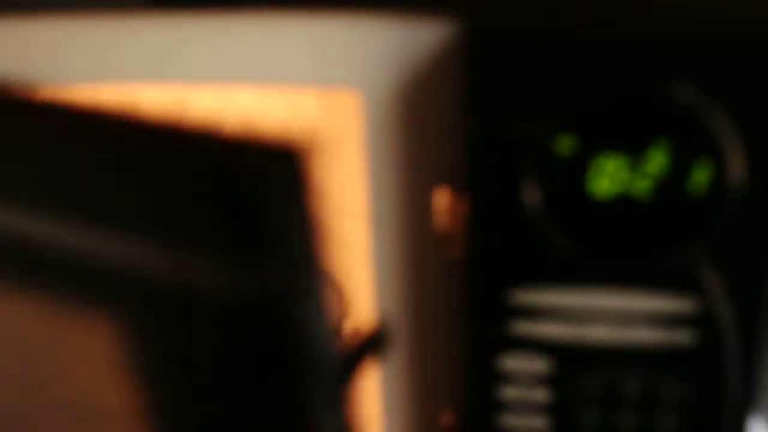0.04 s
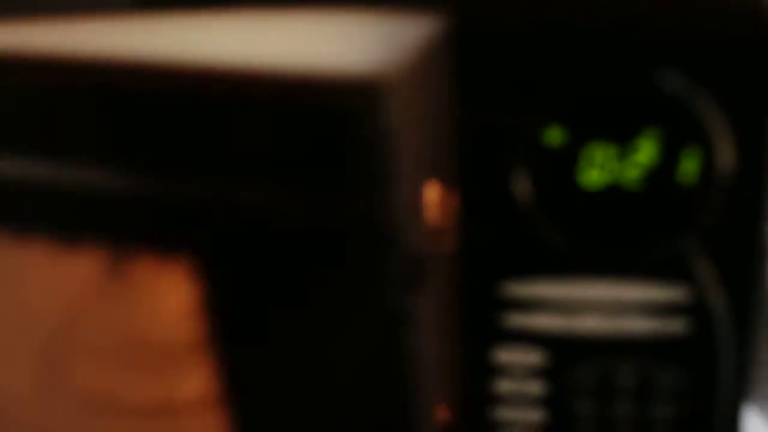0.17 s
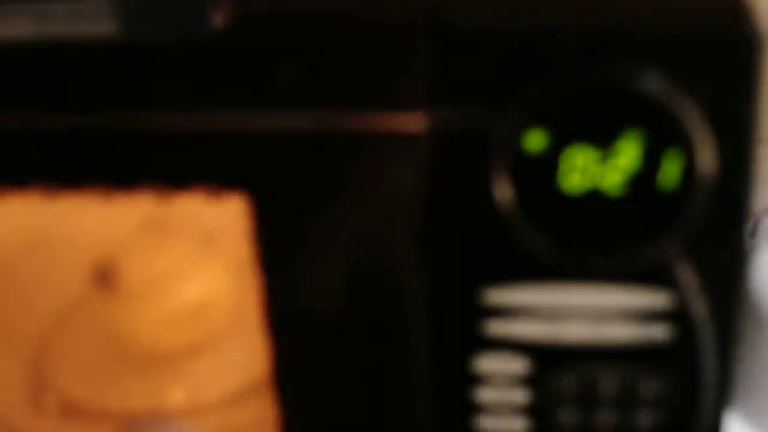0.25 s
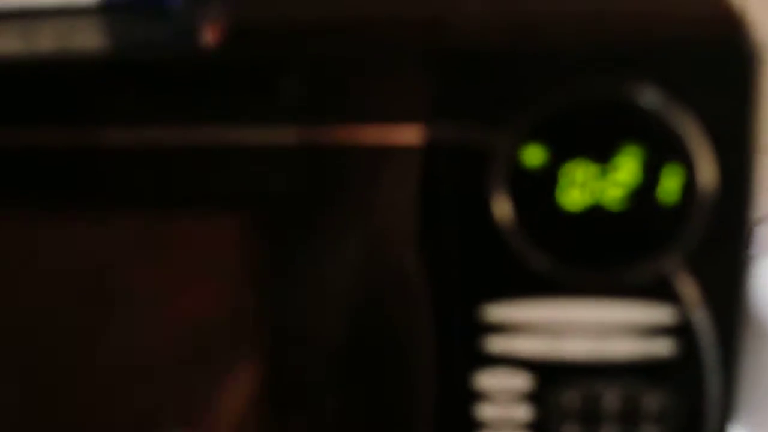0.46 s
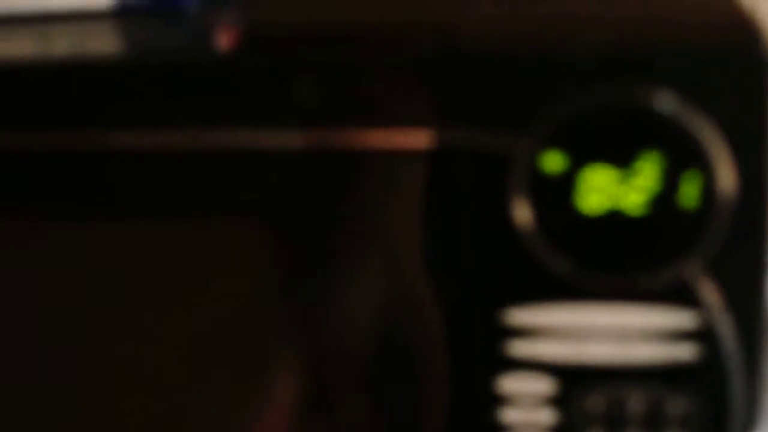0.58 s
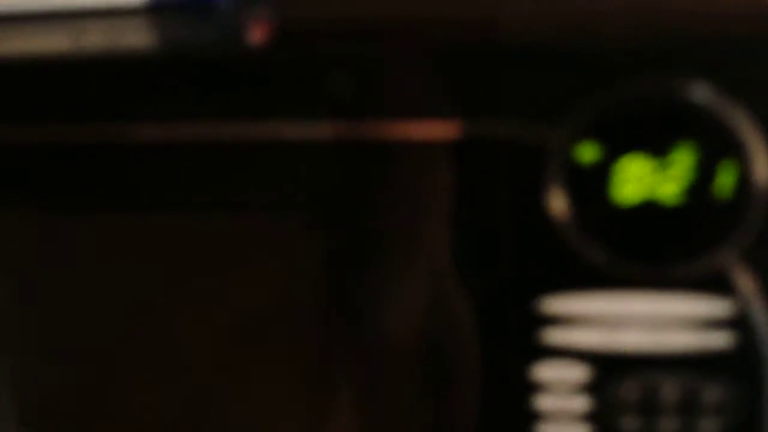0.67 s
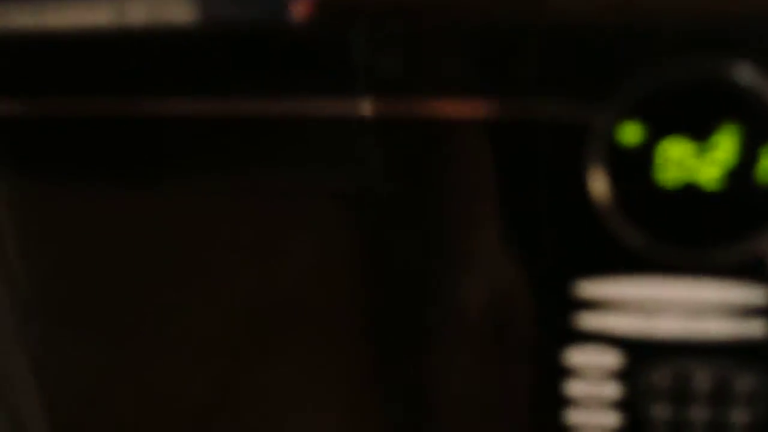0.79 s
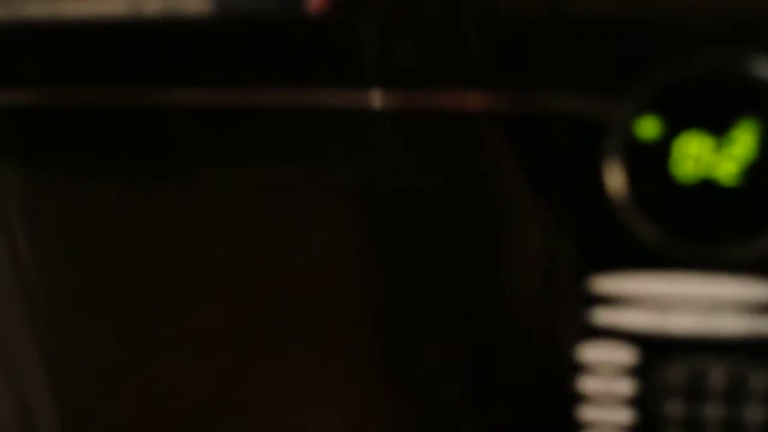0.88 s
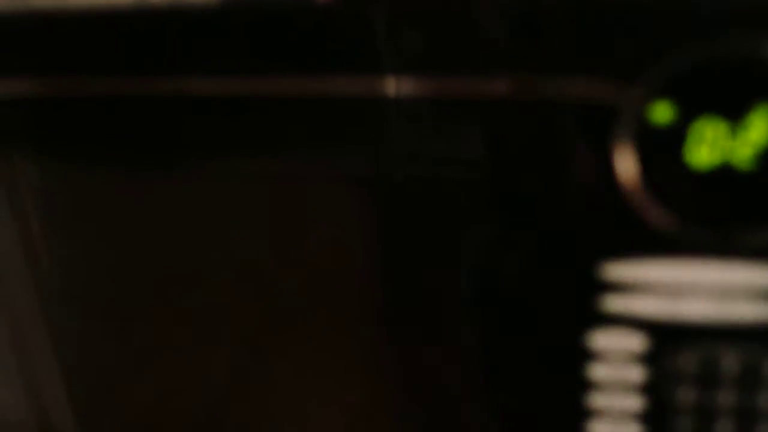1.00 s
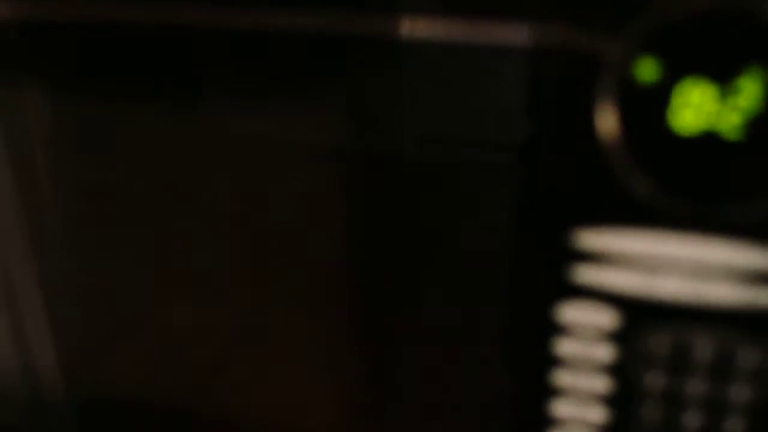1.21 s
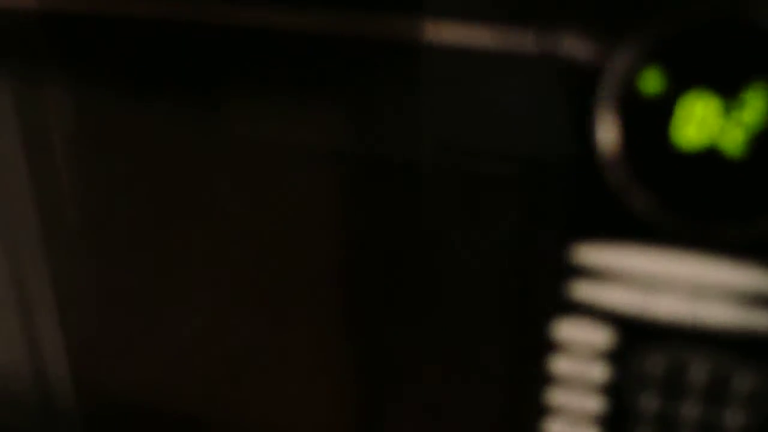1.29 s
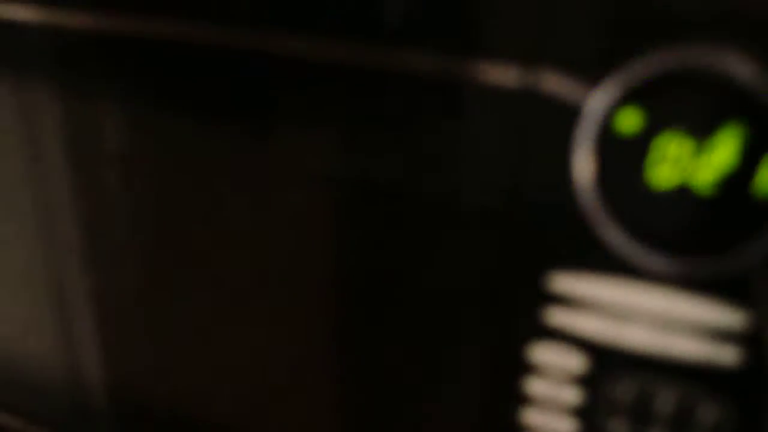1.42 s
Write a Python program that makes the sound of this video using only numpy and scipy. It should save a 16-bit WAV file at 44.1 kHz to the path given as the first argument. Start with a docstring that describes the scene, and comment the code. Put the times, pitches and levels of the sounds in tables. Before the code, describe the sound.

A microwave door slams shut, close and slightly muffled, in a quiet room with faint hiss. At about 0.25 seconds the plastic latch rattles, and at 0.3 the door hits with a loud thud and sharp click. The metal case rings and fades by about 0.8 seconds, low tones lingering. From 0.9 seconds come soft rustling and a few small knocks, with a faint squeak around 1.4.

```python
"""Microwave door swung shut

Quiet room, one dull mono microphone close to the door. The latch hooks strike and rattle over their
catches, then the door slams home and overloads the microphone. The metal case rings and the room dies
away, a few low tones lingering. Afterwards, a soft rustle of movement and some small knocks."""
import sys
import numpy as np
from scipy import signal
from scipy.fft import rfft, irfft
from scipy.io import wavfile

SR = 44100
rng = np.random.default_rng(int(sys.argv[2]) if len(sys.argv) > 2 else 0)


def master_out(mix):
    """Clip the mix to full scale and print it as 16-bit PCM to the path in sys.argv[1]."""
    frames = np.transpose(np.atleast_2d(mix))
    ceiling = np.clip(frames, -1, 1)
    pcm = np.round(ceiling * 32767).astype(np.int16)
    wavfile.write(sys.argv[1], SR, pcm)


N = 63945
T = np.arange(N) / SR

# room hiss spectrum: freq_hz, relative_db
HISS_COLOUR = [(15, -54), (25, -25), (60, -6.5), (85, -20), (149, -10), (255, -11), (341, -7), (521, -15.5),
               (931, -16.5), (5200, -25), (6760, -27.5), (11400, -120)]
# hooks striking and riding over their catches: start_s, level_db
LATCH_HITS = [(0.2390, -18.5), (0.2425, -16), (0.2525, -19), (0.2598, -13), (0.2702, -19), (0.2835, -22)]
# spectrum of a hook strike: freq_hz, relative_db
LATCH_COLOUR = [(50, -30), (120, -14), (250, -3), (500, 2), (780, -0.5), (1300, -4), (2000, 0),
                (2700, -4.5), (3500, -1.5), (4200, -5), (5200, -5)]
# modes of the plastic latch: pitch_hz, level_db, t60_s
LATCH_MODES = [(714, -22, .13), (772, -21, .2), (1045, -27, .15), (1545, -28, .2), (2780, -28, .2),
               (4049, -32, .22), (1822, -24, .15), (1922, -21, .13), (3420, -20, .08), (3660, -25, .14),
               (4545, -25, .14), (4830, -26, .12), (5040, -27, .12)]
# modes of case and door: pitch_hz, slam_level_db, latch_level_db, t60_s
CASE_MODES = [(125, -28, -40, .45), (155, -22, -32, .42), (331, -21, -34, .35), (525, -23, -31, .33),
              (594, -17, -33, .22), (246, -28, -38, .45), (284, -23, -36, .18), (707, -29, -36, .4),
              (1000, -28, -28, .25), (1257, -24, -33, .2), (1281, -29, -38, .35), (1442, -28, -36, .28),
              (2025, -28, -27, .25), (2369, -31, -28, .25)]
# reverberation spectrum: freq_hz, relative_db
ROOM_COLOUR = [(35, -29), (60, -21.5), (100, -1), (180, -4.5), (300, 3.5), (600, -0.5), (1200, -4.5),
               (2200, -8.5), (3500, -15), (5200, -14.5)]
# reverberation time: freq_hz, t60_s
ROOM_T60 = [(80, 1.0), (300, 1.0), (800, 0.81), (2000, 0.71), (5000, 0.81)]
# body of the slam: freq_hz, relative_db
SLAM_COLOUR = [(35, -26), (70, -13), (110, -3), (250, 3), (400, -1), (580, 3), (900, -6), (1400, -10),
               (2200, -9), (3500, -13), (5200, -13)]
# crack at the front of the slam: freq_hz, relative_db
CRACK_COLOUR = [(200, -11), (1000, 3), (2500, 3), (5200, -10.5)]
# tones that outlast the slam: pitch_hz, level_db, t60_s
LINGERING_TONES = [(196.2, -41.5, 3.04), (191, -49.5, 2.7), (460, -37.5, 2.63), (296, -37, 1.33),
                   (576, -44.5, 2.4), (100.5, -35.5, 1.2), (158.4, -36, 1.6)]
# course of the rustle: time_s, level_db
RUSTLE_LEVELS = [(0.86, -70), (0.925, -43), (0.96, -42.5), (0.985, -41), (1.03, -42.5), (1.075, -39.5),
                 (1.135, -51), (1.16, -46), (1.185, -54.5), (1.22, -44.5), (1.30, -53), (1.33, -59),
                 (1.35, -44), (1.41, -45.5), (1.45, -42.5)]
# rustle spectrum: freq_hz, relative_db
RUSTLE_COLOUR = [(80, -15), (200, 2), (380, 1), (600, 0), (1300, -1.5), (2200, -7), (3500, -14),
                 (5200, -14.5)]
# scraping resonances, relative to the rustle: pitch_hz, relative_db
SCRAPE_TONES = [(945, -18), (1356, -15), (1861, -16), (2705, -20), (3600, -24)]
# course of the rubbing note: time_s, level_db
RUB_LEVELS = [(0.94, -86), (0.97, -37.5), (1.02, -44.5), (1.07, -40), (1.13, -53.5), (1.2, -67)]
# handling knocks: start_s, level_db
KNOCKS = [(0.9700, -37), (1.0045, -38), (1.1960, -41), (1.3345, -30.5), (1.3945, -37)]
# knock spectrum: freq_hz, relative_db
KNOCK_COLOUR = [(80, -31), (350, 8), (800, -6.5), (1600, -2.5), (2600, -12.5), (3700, -14), (5200, -25.5)]
# bright scuffs: start_s, level_db
SCUFFS = [(1.062, -47), (1.148, -47.5)]
# scuff spectrum: freq_hz, relative_db
SCUFF_COLOUR = [(300, -27), (1500, -19), (4000, 5), (5200, 2)]

LATCH_S, SLAM_S = LATCH_HITS[0][0], .2874


def from_db(db):
    """Decibels to gain."""
    return 10 ** (np.asarray(db) / 20)


def rms_one(x):
    """Scale to rms 1."""
    return x / np.sqrt(np.mean(x ** 2) + 1e-20)


def at_hz(points, hz):
    """Read a table on a log-frequency axis."""
    freqs, values = np.transpose(points)
    return np.interp(np.log(hz), np.log(freqs), values)


def level_curve(rows):
    """Gain over time from (time_s, level_db) rows."""
    return from_db(np.interp(T, *np.transpose(rows)))


def swell(centre_s, width_s):
    """Bell-shaped envelope peaking at 1."""
    return np.exp(-.5 * ((T - centre_s) / width_s) ** 2)


def strike(start_s, attack_s, t60_s):
    """Envelope: a straight rise, then an exponential decay."""
    age = np.maximum(T - start_s, 0)
    return np.minimum(age / attack_s, 1) * np.exp(-np.log(1000) * np.maximum(age - attack_s, 0) / t60_s)


def coloured(x, colour):
    """Give a steady signal a spectrum, rolled off below 22 Hz and above 6500 Hz; rms 1."""
    hz = np.maximum(np.arange(N // 2 + 1) * SR / N, 1)
    roll_off = 1 / np.sqrt((1 + (hz / 6500) ** 16) * (1 + (22 / hz) ** 4))
    return rms_one(irfft(rfft(x) * from_db(at_hz(colour, hz)) * roll_off, N))


def noise(colour):
    """Steady noise with a spectrum; rms 1."""
    return coloured(rng.standard_normal(N), colour)


def band(x, low_hz, high_hz):
    """Band-pass."""
    return signal.sosfilt(signal.butter(2, [low_hz, high_hz], "band", fs=SR, output="sos"), x)


def resonate(x, hz, width_hz):
    """Drive one resonance; rms 1."""
    return rms_one(band(x, hz - width_hz / 2, hz + width_hz / 2))


def ring(start_s, hz, db, t60_s, attack_s=1 / SR):
    """One struck mode."""
    return from_db(db) * strike(start_s, attack_s, t60_s) * np.sin(2 * np.pi * hz * (T - start_s))


def blows(rows, colour, attack_s, t60_s):
    """Noise bursts: each blow sets off crowded, quickly damped modes."""
    return sum(from_db(db) * strike(start_s, attack_s, t60_s) * noise(colour) for start_s, db in rows)


def room_tone(hiss_db=-49, dip_db=-4, hum_hz=59, hum_db=-59):
    """Room hiss, which dips for a moment after the slam, and mains hum."""
    hiss = from_db(hiss_db + dip_db * swell(centre_s=.72, width_s=.11)) * noise(HISS_COLOUR)
    return hiss + from_db(hum_db) * np.sin(2 * np.pi * hum_hz * T)


def latch():
    """The hooks rattle over their catches; the first touch rings the plastic."""
    rattle = blows(LATCH_HITS, LATCH_COLOUR, attack_s=.0027, t60_s=.1)
    return rattle + sum(ring(LATCH_S + rng.uniform(0, .004), *mode) for mode in LATCH_MODES)


def metal_case():
    """Latch and slam each ring the case and door, the modes alternating in polarity."""
    out = np.zeros(N)
    for k, (hz, slam_db, latch_db, t60_s) in enumerate(CASE_MODES):
        from_latch = ring(LATCH_S + rng.uniform(0, .00381), hz, latch_db, t60_s)
        from_slam = ring(SLAM_S, hz, slam_db, t60_s)
        out += (-1) ** k * (from_latch + from_slam)
    return out


def room_tail(latch_db=-25.5, slam_db=-22.5, late_db=-35, build_s=.017):
    """Diffuse tail of latch and slam, longer in the bass, with a late swell of reflections."""
    edges_hz = 40 * 2 ** np.arange(0, 8.1, .5)  # half octaves
    washes = [noise(ROOM_COLOUR), noise(ROOM_COLOUR)]  # alternated, so adjacent bands add in power
    late = from_db(late_db) * swell(centre_s=.467, width_s=.069)
    out = np.zeros(N)
    for k, (low, high) in enumerate(zip(edges_hz, edges_hz[1:])):
        t60_s = at_hz(ROOM_T60, np.sqrt(low * high))
        from_latch = from_db(latch_db) * strike(LATCH_S, build_s, t60_s)
        from_slam = from_db(slam_db) * strike(SLAM_S, build_s, t60_s)
        out += band(washes[k % 2], low, high) * np.sqrt(from_latch ** 2 + from_slam ** 2 + late ** 2)
    return out


def cavity_boom():
    """The closing door pushes air into the cavity, which booms."""
    return ring(start_s=.247, hz=145.8, db=-13.5, t60_s=.13, attack_s=.022)


def slam():
    """The door hits home: a thud, a crack and a heavily damped clap of the panel."""
    thud = blows([(SLAM_S, -4.5)], SLAM_COLOUR, attack_s=.001, t60_s=.09)
    crack = blows([(SLAM_S, -12)], CRACK_COLOUR, attack_s=.001, t60_s=.012)
    clap = ring(SLAM_S, hz=330, db=0, t60_s=.024)
    return thud + crack - clap


def lingering_tones():
    """Low tones hang in the room after the slam; a close pair beats."""
    return sum(ring(SLAM_S, *tone) for tone in LINGERING_TONES)


def rustle(grains_per_s=2500, spread_db=2):
    """Soft movement: tiny random clicks merge into a rustle and drive scraping resonances."""
    sizes = from_db(spread_db * np.minimum(rng.exponential(1, N), 5))
    signs = rng.choice([-1, 1], N)
    grains = sizes * signs * (rng.random(N) < grains_per_s / SR)
    scrape = sum(from_db(db) * resonate(grains, hz, width_hz=28) for hz, db in SCRAPE_TONES)
    return level_curve(RUSTLE_LEVELS) * (coloured(grains, RUSTLE_COLOUR) + scrape)


def rub():
    """Rubbing noise drives one resonance: a hollow note within the rustle."""
    return level_curve(RUB_LEVELS) * resonate(rng.standard_normal(N), hz=382, width_hz=80)


def knocks():
    """Small handling knocks, quickly damped."""
    return blows(KNOCKS, KNOCK_COLOUR, attack_s=.00087, t60_s=.035)


def scuffs():
    """Two brief bright scuffs with soft onsets."""
    return blows(SCUFFS, SCUFF_COLOUR, attack_s=.0087, t60_s=.27)


def bump():
    """A soft bump rings one low mode."""
    return ring(start_s=1.17, hz=249, db=-46.5, t60_s=.56)


def squeak(start_s=1.432, rise_s=.016, pitch_hz=1040, level_db=-36):
    """A faint pure squeak sets in at the very end."""
    fade_in = np.clip((T - start_s) / rise_s, 0, 1)
    return from_db(level_db) * fade_in * np.sin(2 * np.pi * pitch_hz * T)


def scene():
    """Door, room and movement at one microphone position."""
    door = latch() + cavity_boom() + slam() + metal_case()
    decay = room_tail() + lingering_tones()
    movement = rustle() + rub() + scuffs() + knocks() + bump() + squeak()
    return (door + decay + movement + room_tone())[None]


def record(dry, low_hz=40.7, top_hz=5380, ceiling=.72, hardness=6, cutoff_hz=15900):
    """A narrow-band microphone overloads on the loudest peaks; a steep top cut follows."""
    taps = signal.firwin(81, top_hz, fs=SR, window=("kaiser", 7))
    dull = signal.fftconvolve(dry, taps[None], mode="same")
    narrow = signal.sosfilt(signal.butter(2, low_hz, "high", fs=SR, output="sos"), dull)
    clipped = narrow / (1 + np.abs(narrow / ceiling) ** (2 * hardness)) ** (.5 / hardness)
    return signal.sosfilt(signal.ellip(10, .1, 80, cutoff_hz, fs=SR, output="sos"), clipped)


dry = scene()
out = record(dry)
master_out(out)
```